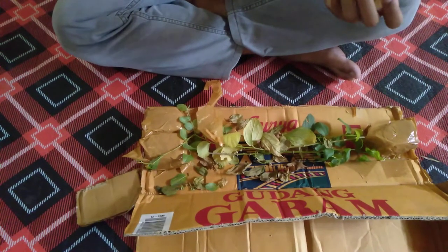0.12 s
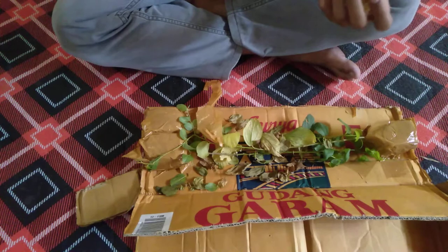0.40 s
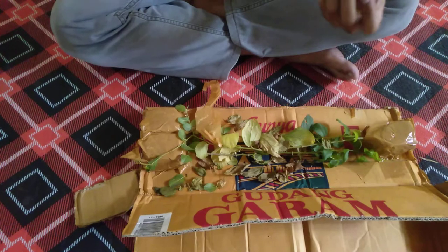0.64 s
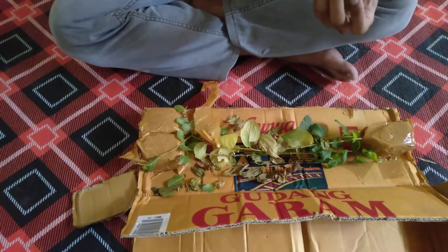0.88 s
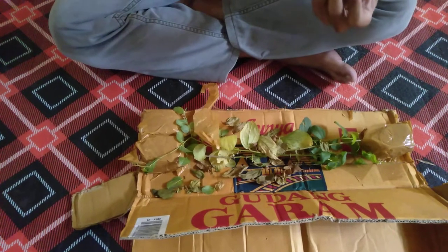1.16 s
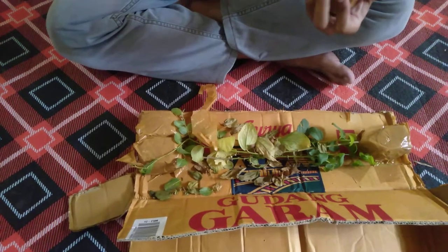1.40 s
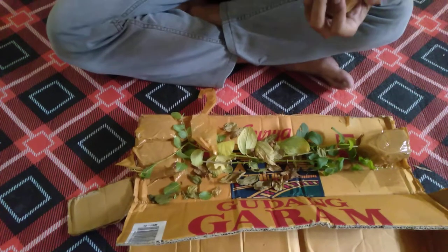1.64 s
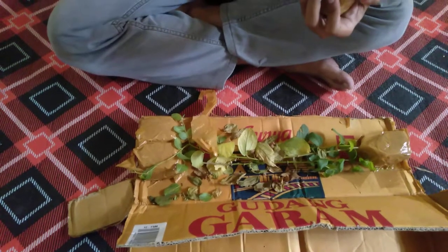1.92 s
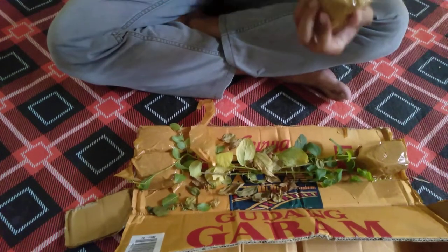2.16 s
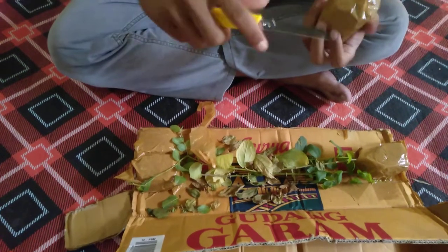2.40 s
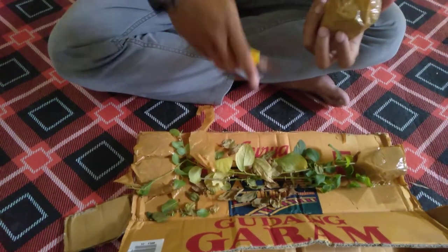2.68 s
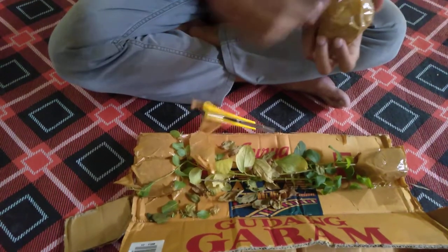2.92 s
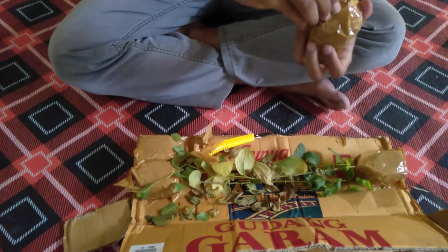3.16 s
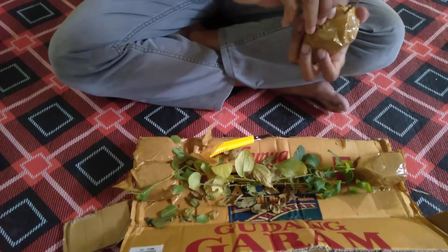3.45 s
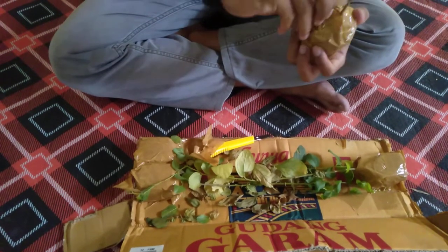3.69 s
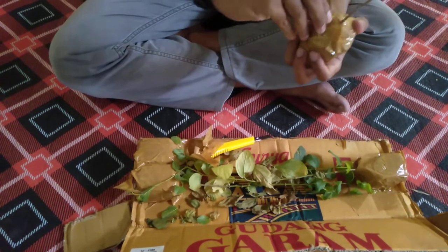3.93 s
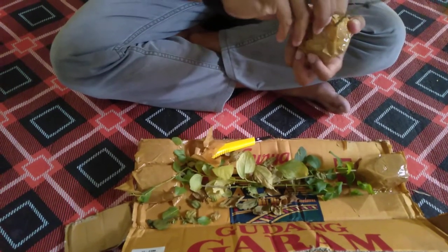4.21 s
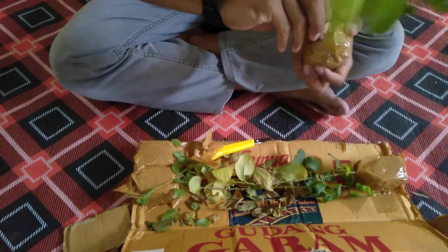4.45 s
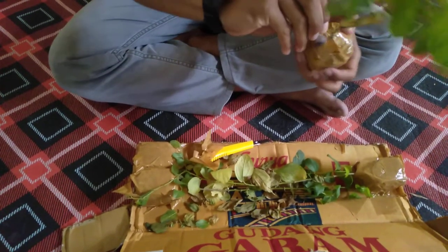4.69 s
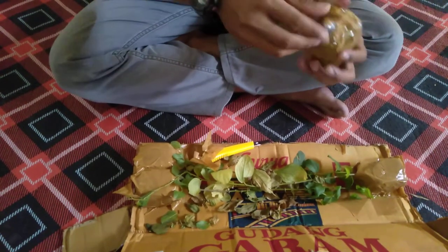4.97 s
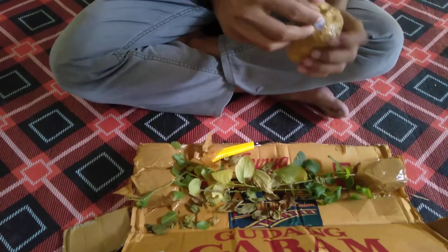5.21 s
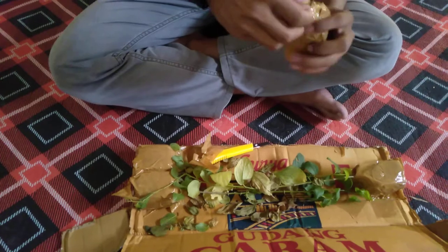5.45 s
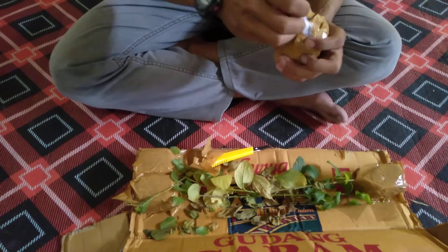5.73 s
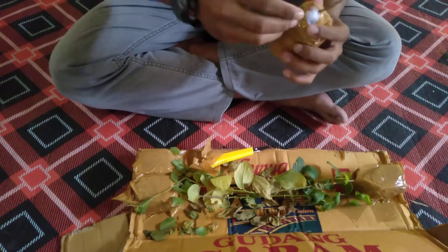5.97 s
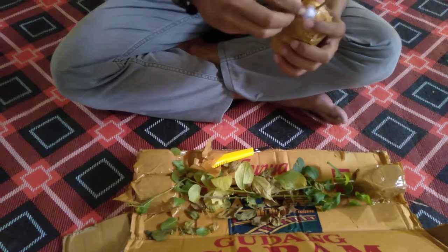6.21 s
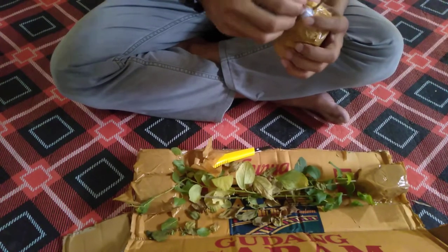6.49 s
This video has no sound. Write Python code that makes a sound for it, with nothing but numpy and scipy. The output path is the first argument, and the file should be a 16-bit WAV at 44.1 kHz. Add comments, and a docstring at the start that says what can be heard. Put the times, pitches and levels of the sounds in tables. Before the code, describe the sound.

Sparse dry tape slips and scratches come first, growing sharper before a rapid series of slider clicks. A light knife lands on a cardboard sheet, bounces and rattles briefly. Afterwards crisp film pops and crackles irregularly as fingers work it, with faint soft rubs. The indoor space is quiet with a short tail; a phone nearby catches faint hush, outdoor low rumble, a distant engine hum and tiny high whistles.

```python
"""Ticks and scrapes of a knife slitting packing tape in a quiet room, over a faint hush and low outdoor rumble.
The blade ratchets back, the knife drops on flat cardboard, then fingers pick plastic wrap, which snaps.
Cuts, notches, landings and snaps are noise bursts in three registers; cardboard is decaying sine modes;
a fine crackle all through is random ticks over sizzle; rubs are puffs of band noise. A short room tail,
a far engine note and thin far whistles lie behind."""
import sys
import numpy as np
from scipy import signal
from scipy.fft import rfft, irfft
from scipy.io import wavfile
from scipy.ndimage import uniform_filter1d

SR = 44100
rng = np.random.default_rng(int(sys.argv[2]) if len(sys.argv) > 2 else 0)


def store_pcm(level_fs):
    """Save levels as 16-bit WAV."""
    pcm = np.round(np.clip(level_fs, -1, 1) * 32767).astype(np.int16)
    wavfile.write(sys.argv[1], SR, np.atleast_2d(pcm).T)


def how_loud(loudness_db):
    """Turn decibels into a plain amplitude multiplier (0 dB gives 1, 20 dB gives 10)."""
    steps = np.asarray(loudness_db, float) / 20
    return 10 ** steps


N = 291060
TIME = np.arange(N) / SR

# blade biting and slitting tape; body and top are relative to the middle:
# (time [s], middle level [dB], body [dB], top [dB], decay [ms])
CUTS = [(0.0565, -67, 7, 0, 1.8), (0.0732, -55.5, -17, -3, 4.8), (0.1725, -46, -13, -12, 2.5),
        (.285, -52, -5.5, 0, 1.9), (0.343, -52, -3, -7, 5), (0.364, -57, -5, 11, 1.5),
        (.382, -60.5, 5.5, -1, 11), (0.4047, -48.5, 0, 8, 11), (0.4158, -41, 3.5, 2, 6.9),
        (0.423, -39.5, -1, -14, 7.4), (0.4338, -45, 0, 15, 2.4), (0.445, -41.5, -22, -4, 6.9),
        (.4603, -47, -8, 7, 3.6), (.5101, -57, 5, 10, 3.4), (0.861, -54, -13, 2, 4.7),
        (0.872, -51.5, -6, -1, 3.9), (.9391, -45.5, -1, -2, 3), (.9727, -58, 1, 16, 1.1),
        (1.0094, -55, -13, 11, .7), (1.0253, -45.5, -1, 6, 3), (1.0459, -47.5, 7.5, 8, 7.5),
        (1.0571, -38, 2, 6.5, 8.4), (1.0706, -45.5, -16, 1, 6.2), (1.078, -42, -27, 16, 0.78),
        (1.449, -53.5, -7, -4, 2.4), (1.5351, -52, -13, -18.5, 4.6), (1.56, -56, -7, -1, 4.1),
        (1.6992, -53, -8, 5, 8.1), (1.711, -51, -6, 9, 3.6), (1.921, -53, -19, 1, .9),
        (1.937, -53, -4.5, 4, 1.1), (1.9426, -49.5, -14, 5, 5.8), (2.007, -51, -12, -1, 1.7),
        (2.0168, -53.5, -1.5, 5, 3.3), (2.1346, -40, -12, 8.5, 2.4), (2.1488, -44.5, 2, 7, 10),
        (2.163, -29, -1, 2, 2), (2.1694, -34, -3, 5.5, 2.3), (2.1805, -37.5, -6.5, 0, 4.5),
        (2.1949, -48, 2, 11, 2.6), (2.2098, -56.5, 9.5, -2, 5.5), (2.3708, -47, -17, -11, 2.9),
        (2.385, -38.5, -14.5, 1.5, 6.5), (2.4448, -43, -14, 5, 3.2), (2.459, -38.5, -12, 2.5, 10),
        (2.471, -45, -10.5, -15, 5.6)]


def tape_cuts():
    """Tape gives way in short runs of slips, each with its own decay and body pitch."""
    decays_ms = [row[-1] for row in CUTS]
    rows = varied(CUTS, decays_ms, body_hz=2060, ms_spread=0, hz_spread=0.071)
    return bursts(rows, rise_ms=0.92, sharpness=0.76)


# slider jumping its notches, quickening, with a longer last gap: (time [s], nominal middle level [dB])
NOTCHES = [(2.5008, -29), (2.531, -30), (2.5497, -32), (2.5625, -29), (2.5735, -29.5), (2.584, -31),
           (2.5918, -31), (2.599, -30), (2.608, -25.5), (2.616, -26), (2.6228, -28), (2.631, -28),
           (2.646, -28.5)]


def blade_slider():
    """Each notch frees the slider in one bright click."""
    body_db, top_db = -18.5, 5  # relative to the middle
    notches = [(s, db, body_db, top_db) for s, db in NOTCHES]
    rows = varied(notches, ms=2.24, body_hz=2270, ms_spread=0.15, hz_spread=0.062)
    return bursts(rows, rise_ms=1.1, sharpness=1.0)


# knife landing, bouncing and rattling; body, top and thud are relative to the level:
# (time [s], nominal level [dB], body [dB], top [dB], thud [dB])
DROPS = [(2.8588, -24, -9, 6, -1.5), (2.8701, -33, 2, 1, 9), (2.9182, -45, 2, -3, -18),
         (2.925, -48, -20, -6, -21), (3.0045, -29, -12, -2, -23), (3.0158, -41.5, -8, 9, -21),
         (3.031, -50, -2, -13, -7), (3.0363, -38.5, -17, -1, -1.5), (3.0471, -36, -8.5, 2, -9),
         (3.053, -40, -4, 5, -23), (3.064, -43, -12, -11, -15), (3.077, -39.5, -23, 1, -26),
         (3.1117, -52, -5, -8, -28)]


def knife_drop():
    """Each contact is a broad clack of the knife plus a thud of the sheet."""
    rows = varied(DROPS, ms=3.3, body_hz=1200, ms_spread=0.17, hz_spread=0.11)
    return bursts(rows, rise_ms=1.0, sharpness=0.2) + cardboard()


# modes of the sheet, nominal: (frequency [Hz], relative level [dB], T60 [s])
CARDBOARD = [(71.8, -10, 0.19), (123, -31, 0.044), (163, 6, 0.099), (196, 2, 0.066), (252, 0.5, 0.08),
             (309, -8, 0.027), (420, -10, 0.022), (520, -18, 0.02), (640, -3, 0.024), (742, 17.5, 0.022),
             (815, 8.5, 0.027), (969, 3, 0.025), (1230, 6, 0.045)]


def cardboard(push_ms=0.71):
    """Every landing rings the same low modes, each time slightly detuned and in another mix."""
    t = TIME[:SR // 4]
    out = np.zeros(N)
    mix = rng.standard_normal((len(DROPS), len(CARDBOARD)))
    for (s, db, *_, thud_db), shifts in zip(DROPS, mix):
        ring = np.zeros(len(t))
        for (hz, mode_db, t60_s), shift in zip(CARDBOARD, shifts):
            decay = how_loud(mode_db + 1.6 * shift - 60 * t / t60_s)
            ring += decay * np.sin(2 * np.pi * hz * (1 + 0.048 * shift) * t)
        ring *= 1 - np.exp(-t * 1000 / push_ms)  # a soft sheet takes the blow slowly
        start = int(s * SR)
        out[start:start + len(t)] += how_loud(db + thud_db) * ring / np.abs(ring).max()
    return out


# clear snaps of film buckling or letting go under the fingers; body and top are relative to the middle:
# (time [s], nominal middle level [dB], body [dB], top [dB])
SNAPS = [(3.169, -42.5, -4.5, -4), (3.1811, -45, -16, -4), (3.2518, -63.5, -8, 21.5),
         (3.2817, -52, -25, -1), (3.3276, -50, -22, -12), (3.4206, -56, -25, -7), (3.4279, -33.5, -12, 5.5),
         (3.4529, -56, -20, 9), (3.4808, -40.5, -19, 5.5), (3.4878, -42.5, -13, -9), (3.5673, -49.5, -4, 1),
         (3.5964, -49.5, -5, 5), (3.6418, -51.5, -17, 4), (3.7007, -41.5, -14.5, 2.5),
         (3.7535, -57, -2, 13), (3.9779, -55.5, -27, -6), (4.1297, -29.5, -11, -4), (4.1347, -49, 4, 8),
         (4.142, -44, -27, 13), (4.2013, -41, -23, -1), (4.221, -42, -8.5, 4), (4.2668, -48, -9.5, -7),
         (4.2949, -48, -1.5, 2), (4.3076, -44, -25, -13), (4.3662, -40.5, -17, 2), (4.4208, -43, -10.5, 4),
         (4.491, -47, -15, -2), (4.5084, -46, -20, -4), (4.559, -51, -20, 9), (4.5691, -48, -16, 7),
         (4.5917, -36.5, -23, -16), (4.6107, -45, -5, 5), (4.6626, -55, -11, 11), (4.8124, -47.5, -7, 5),
         (4.8304, -42.5, -13, -2), (4.8683, -57, -6, 9), (5.0382, -43.5, -21, 1), (5.0702, -48.5, -14, 12),
         (5.087, -55, -11, 11), (5.1532, -55, -6, 7), (5.1856, -43.5, -13.5, 4), (5.2321, -60, -4, 11),
         (5.4178, -53, -15, 13), (5.4341, -57.5, -2, 17), (5.4782, -49, -24, -4), (5.5028, -46.5, -29, -11),
         (5.5161, -44.5, -15, 2), (5.5716, -45, -14, 10), (5.6902, -46.5, -23, -1), (5.8211, -52, -10, 10),
         (5.8298, -46.5, -15, -7), (5.8752, -45, -10, 1), (5.8959, -43.5, -11, 3), (5.9144, -58, -16, 18),
         (5.9678, -49, -20, 0), (5.9939, -44, -20, 6), (6.1291, -52.5, -4.5, 6), (6.1974, -57, -3, 15),
         (6.2112, -51, -10, 9), (6.3177, -44, -19.5, -2), (6.3718, -49.5, -27, -1), (6.4885, -57, 7, 11),
         (6.5765, -57, 1, -25)]


def wrap_snaps():
    """Film buckles abruptly: sharp bursts, the clear ones among faint chance ones."""
    rows = varied(list(SNAPS) + faint_snaps(), ms=1.39, body_hz=2100, ms_spread=0.52, hz_spread=0.18)
    return bursts(rows, rise_ms=0.2, sharpness=3.4)


def faint_snaps(scatter_db=2.0):
    """Small snaps at chance moments, denser and louder where the crackle is strong."""
    picking_from_s, chances, busy_db = 3.15, 260, -64
    when, luck = rng.random((chances, 2)).T
    s = picking_from_s + when * (TIME[-1] - picking_from_s)
    middle_db, top_db = (c[(s * SR).astype(int)] for c in curve(CRACKLE))
    size, body, top = scatter_db * rng.standard_normal((chances, 3)).T
    db = middle_db + 9.5 + size
    rows = np.transpose([s, db, -11.5 + 2 * body, top_db + 10 + top - db])
    return list(rows[luck < how_loud((top_db - busy_db) / 2)])


# fine crackle of tape and knife handling, then of the picked wrap, nominal:
# (time [s], middle level [dB], top level [dB])
CRACKLE = [(0, -72.5, -72), (.27, -87, -82), (.41, -59.5, -60), (.58, -82, -86), (.99, -77, -74),
           (1.06, -49, -74), (1.22, -75, -76), (1.76, -78, -76), (1.97, -72.5, -70), (2.33, -77, -85),
           (2.44, -55, -59), (2.54, -57.5, -61), (2.6, -50, -43), (2.7, -54, -49), (2.84, -73, -85),
           (3.04, -57.5, -54), (3.18, -82, -75), (4.08, -73.5, -72), (4.49, -67, -62.5), (4.74, -73, -74),
           (4.83, -70.5, -67), (5.38, -78.5, -73), (5.44, -66.5, -63.5), (5.73, -64, -55.5),
           (5.78, -78, -75.5), (5.89, -62.5, -56), (5.97, -72.5, -71), (6.47, -72, -68), (6.6, -77, -79)]


def crackle(per_second=600, scatter_db=4.0, tilt_db=3.0, body_db=-12):
    """Unequal ticks come in flurries, each duller or brighter, over a sizzle of slips too fine to tell apart."""
    middle_db, top_db = curve(CRACKLE)
    struck = rng.random(N) < per_second * how_loud(3.5 * walk(30)) / SR
    size, tilt = rng.standard_normal((2, N))
    slips = rng.standard_normal(N)
    sizzle = how_loud(-8 + 3 * walk(25))
    tick_decay = np.exp(-TIME[:200] / .0005)
    pushes = []
    for lean, db in (0.16, middle_db + body_db), (0.95, middle_db), (0.62, top_db):
        strikes = struck * how_loud(scatter_db * size + lean * tilt_db * tilt)
        ticks = through(strikes, tick_decay)
        ticks = ticks / np.sqrt(np.mean(ticks ** 2))
        pushes.append(how_loud(db) * (ticks + sizzle) * slips)
    pushes[0] = resonance(pushes[0], 3600, 1.0)
    return sum(through(push, colour) for push, colour in zip(pushes, registers()))


# short soft rubs of skin, cloth and knife handle, level before patchiness:
# (start [s], length [s], level [dB], centre [Hz])
RUBS = [(0, .14, -67, 2150), (0.392, .08, -65, 2020), (0.922, 0.055, -71, 2600), (1.04, .08, -67, 1950),
        (1.831, 0.079, -72, 2150), (1.937, 0.038, -70, 2900), (2.391, 0.097, -61.5, 2950),
        (2.53, 0.12, -61.5, 2250), (3.01, .07, -60, 2800), (3.621, 0.16, -78.5, 2060),
        (4.399, 0.248, -78, 2050), (4.951, .18, -75.5, 2150), (5.35, .1, -72.5, 2200),
        (5.68, 0.083, -69.5, 2100), (6.44, .09, -72.5, 2150)]


def rub():
    """Friction as noise in one soft band; each puff swells fast, holds, fades and sets the centre."""
    rest_db, rise_db_per_s, fall_db_per_s, width_hz = -79.5, 400, 170, 600
    s, length_s, peak_db, centre_hz = np.transpose(RUBS)
    early_s = np.maximum(s[:, None] - TIME, 0)
    late_s = np.maximum(TIME - (s + length_s)[:, None], 0)
    puffs_db = peak_db[:, None] - rise_db_per_s * early_s - fall_db_per_s * late_s
    db = np.maximum(puffs_db.max(axis=0), rest_db)
    hz = centre_hz[puffs_db.argmax(axis=0)]
    slow = signal.lfilter(*signal.butter(2, width_hz / 2, fs=SR), rng.standard_normal((2, N)))
    phase = 2 * np.pi * np.cumsum(hz) / SR
    band = slow[0] * np.cos(phase) + slow[1] * np.sin(phase)  # noise shifted up to the centre
    return how_loud(db + 3.1 * walk(30)) * band / band.std()


def room(x):
    """Diffuse tail that builds over some milliseconds; the treble dies a little sooner."""
    t60_s, top_t60_s, build_s, tail_db = 0.37, 0.33, .007, -7.5
    t = TIME[:int(.6 * SR)]
    low = signal.lfilter(*signal.butter(1, 3000, fs=SR), rng.standard_normal(len(t)))
    high = signal.lfilter(*signal.butter(1, 3000, "high", fs=SR), rng.standard_normal(len(t)))
    tail = low * how_loud(-60 * t / t60_s) + high * how_loud(-60 * t / top_t60_s)
    tail *= 1 - np.exp(-(t / build_s) ** 2)
    return through(x, how_loud(tail_db) * tail / np.sqrt(np.sum(tail ** 2)))


# hush colour: (frequency [Hz], relative density [dB per Hz])
HUSH = [(180, -20), (300, -5), (354, 1), (447, 0), (528, -7), (593, -0.5), (1900, -13), (2520, -17.5),
        (4590, -10.5), (6000, -17.5), (6740, -17.5), (10200, -17), (16000, -16.5)]


def hush():
    """Room and microphone noise, nearly steady."""
    noise = through(rng.standard_normal(N), response(HUSH, lo_hz=450))
    return how_loud(-70.5 + .8 * walk(3)) * noise


# rumble colour: (frequency [Hz], relative density [dB per Hz])
RUMBLE_COLOUR = [(12, -29.5), (20, -5.5), (38, -0.5), (81, -6), (118, -2), (161, -6.5), (200, -13.5),
                 (325, -17.5), (387, -16), (414, -37.5), (500, -17), (650, -70), (1100, -120)]
# far traffic, before flicker: (time [s], deep level [dB], upper level [dB])
RUMBLE = [(0, -65.5, -82), (1.03, -69, -80.5), (2.95, -66.5, -78.5), (3.6, -63.5, -81.5), (4.2, -64, -74),
          (5.11, -63.5, -76.5), (5.57, -57.5, -70), (6.09, -61.5, -71.5), (6.6, -57.5, -70.5)]


def traffic():
    """Low noise in two bands that swell apart but flicker together."""
    deep_db, upper_db = curve(RUMBLE)
    deep = through(rng.standard_normal(N), response(RUMBLE_COLOUR, hi_hz=195, size=16384))
    upper = through(rng.standard_normal(N), response(RUMBLE_COLOUR, 204, 568, size=16384))
    return how_loud(0.82 * walk(5.8)) * (how_loud(deep_db) * deep + how_loud(upper_db) * upper)


# far engine note, before flicker: (time [s], frequency [Hz], level [dB])
DRONE = [(3.1, 115.3, -70), (3.65, 117.3, -62.5), (4.42, 124, -90), (4.54, 115.8, -82), (5.05, 119.6, -68),
         (6.17, 121.2, -64), (6.37, 117.7, -59.5), (6.6, 120.5, -64)]


def engine():
    """One low sine whose pitch and level drift."""
    return tone(DRONE, flicker_db=2.3, flicker_rate_hz=15, fade_s=0.11)


# far whistles, perhaps birds or insects, before flicker:
# (start [s], end [s], first frequency [Hz], last frequency [Hz], level [dB])
WHISTLE = [(.66, .85, 6600, 6800, -83.5), (3.21, 3.25, 5730, 5610, -87), (3.25, 3.4, 6350, 6780, -74),
           (4.02, 4.098, 6380, 6340, -75), (4.82, 5.191, 6180, 6830, -73), (5.7, 5.817, 6440, 6890, -77.5),
           (6.0, 6.36, 6350, 6540, -75), (6.33, 6.5, 5700, 5660, -82)]


def whistles():
    """Thin gliding sines with a fast flicker."""
    out = np.zeros(N)
    for s, end_s, hz, end_hz, db in WHISTLE:
        glide = [(s, hz, db), (end_s, end_hz, db)]
        out += tone(glide, flicker_db=4.3, flicker_rate_hz=40, fade_s=0.012)
    return out


def tone(rows, flicker_db, flicker_rate_hz, fade_s):
    """A sine of wavering level that fades in and out at the ends of its table."""
    hz, db = curve(rows)
    on = 1. * (TIME > rows[0][0]) * (TIME < rows[-1][0] + fade_s)
    sounding = uniform_filter1d(on, size=int(fade_s * SR))
    level = np.sqrt(2) * how_loud(db + flicker_db * walk(flicker_rate_hz))
    return level * sounding * np.sin(2 * np.pi * np.cumsum(hz) / SR)


def varied(rows, ms, body_hz, ms_spread, hz_spread):
    """Scatters decay and body pitch about those of the kind; a longer event is softer."""
    chance = rng.standard_normal((len(rows), 2))
    out = []
    for (s, db, body_db, top_db, *_), own_ms, c in zip(rows, np.broadcast_to(ms, len(rows)), chance):
        stretch = ms_spread * c[0]
        own_db = db - 10 / np.log(10) * stretch
        own_hz = body_hz * np.exp(hz_spread * c[1])
        out.append((s, own_db, body_db, top_db, own_ms * np.exp(stretch), own_hz))
    return out


def bursts(rows, rise_ms, sharpness):
    """Each event is a burst of tiny slips that swells to its peak time and dies away; its body has its own pitch."""
    out, slips, colours = np.zeros(N), rng.standard_normal(N), registers()
    for s, db, body_db, top_db, decay_ms, body_hz in rows:
        near = slice(max(int(s * SR) - 300, 0), int(s * SR) + 1200)
        t_ms = (TIME[near] - s) * 1000
        rise = np.exp(-(t_ms / rise_ms) ** 2)
        decay = np.exp(-np.abs(t_ms) / max(decay_ms, .1))
        shape = np.where(t_ms < 0, rise, decay)
        burst = shape * slips[near]
        pushes = resonance(burst, body_hz, sharpness), burst, burst
        for push, colour, part_db in zip(pushes, colours, (body_db, 0, top_db)):
            part = signal.fftconvolve(push, colour)[:len(t_ms)]
            # however the slips fall, the event frees the same energy
            even = np.sqrt(np.sum(shape ** 2) / np.sum(part ** 2))
            out[near] += how_loud(db + part_db) * part * even
    return out


BODY_TOP_HZ, MIDDLE_LOW_HZ, MIDDLE_TOP_HZ = 4000, 3500, 9200
# colour of a snap at the phone, whose port rings near 7 and 15 kHz: (frequency [Hz], relative density [dB per Hz])
COLOUR = [(300, -22), (600, -10.5), (1500, -14), (3000, -14), (4500, -16.5), (6000, -4), (6850, 1.5),
          (7500, -10.5), (9040, -20.5), (10900, -7.5), (13300, 1), (14500, 15.5), (15500, 20.5), (16500, 2)]


def registers():
    """A push sounds in three registers: the dull body of the thing, the middle and the thin top."""
    edges = (0, BODY_TOP_HZ), (MIDDLE_LOW_HZ, MIDDLE_TOP_HZ), (MIDDLE_TOP_HZ, SR)
    return [response(COLOUR, *edge, size=1024) for edge in edges]


def resonance(x, hz, sharpness):
    """One resonance, its gain set to keep about the noise power below the body's upper edge."""
    b, a = signal.iirpeak(hz, sharpness, fs=SR)
    return signal.lfilter(b, a, x) * np.sqrt(2 * sharpness * BODY_TOP_HZ / (np.pi * hz))


def response(points, lo_hz=0, hi_hz=SR, size=4096):
    """Minimum-phase response of unit energy, coloured by (frequency [Hz], level [dB]) between two edges."""
    hz = np.maximum(np.fft.rfftfreq(size, 1 / SR), 1)
    points_hz, points_db = np.array(points)[:, 0], np.array(points)[:, 1]
    db = np.interp(np.log(hz), np.log(points_hz), points_db)
    db = db - 10 * np.log10((1 + (lo_hz / hz) ** 12) * (1 + (hz / hi_hz) ** 12))
    fold = irfft(db * np.log(10) / 20)  # cepstrum, folded to be causal
    fold[1:size // 2] *= 2
    fold[size // 2 + 1:] = 0
    h = irfft(np.exp(rfft(fold)))
    return h / np.sqrt(np.sum(h ** 2))


def through(x, h):
    """Convolution cut to the length of the scene."""
    return signal.fftconvolve(x, h)[:N]


def curve(rows):
    """Columns of a (time [s], ..) table at every sample."""
    s, *columns = np.transpose(rows)
    return [np.interp(TIME, s, c) for c in columns]


def walk(rate_hz):
    """Random levels held for 1 / rate_hz and smoothed twice; spread near 1."""
    k = int(SR / rate_hz)
    steps = np.repeat(rng.standard_normal(N // k + 1), k)
    return 1.3 * uniform_filter1d(uniform_filter1d(steps, k), k)[:N]


def scene():
    """Hands and knife ring the room; the background is already diffuse."""
    knife_and_rubs = tape_cuts() + blade_slider() + knife_drop() + rub()
    snaps_and_crackle = wrap_snaps() + crackle()
    # snaps and crackle feed the room a little less
    tail = room(knife_and_rubs + how_loud(-1.5) * snaps_and_crackle)
    background = hush() + traffic() + engine() + whistles()
    return (knife_and_rubs + snaps_and_crackle + tail + background)[None]


def low_pass(x):
    """Removes everything above the highest recorded frequency."""
    return signal.sosfilt(signal.butter(12, 17140, fs=SR, output="sos"), x)


def record(dry):
    """The phone cuts the top steeply."""
    top_cut = signal.cheby2(16, 26, 15950, fs=SR, output="sos")  # order, stopband [dB], stopband edge [Hz]
    mix = signal.sosfilt(top_cut, dry)
    return low_pass(mix)


dry = scene()
out = record(dry)
store_pcm(out)
```